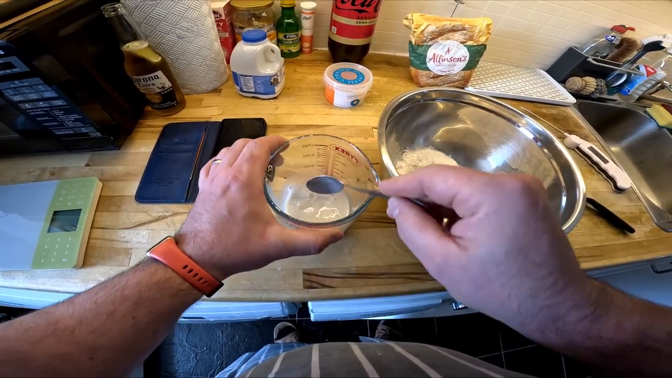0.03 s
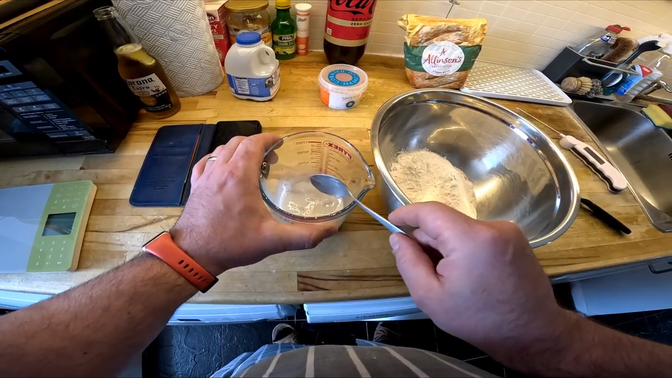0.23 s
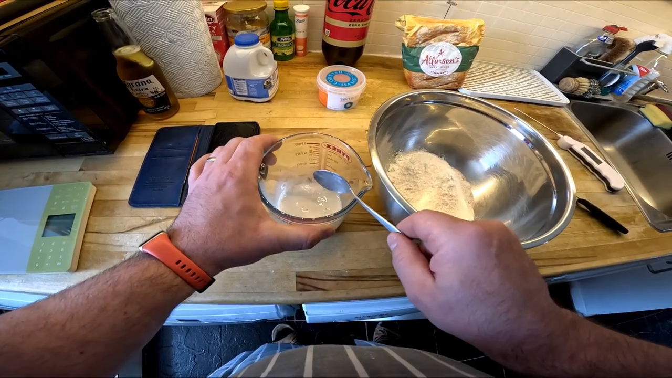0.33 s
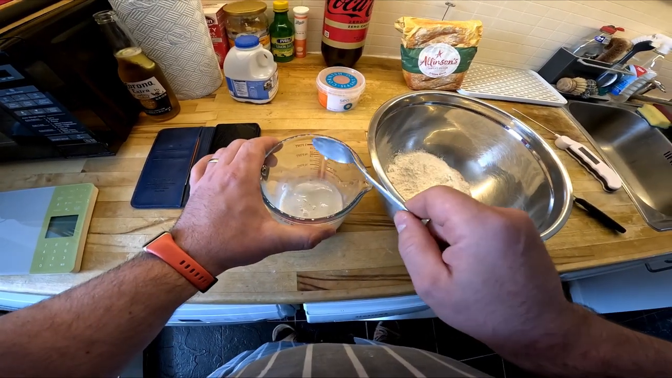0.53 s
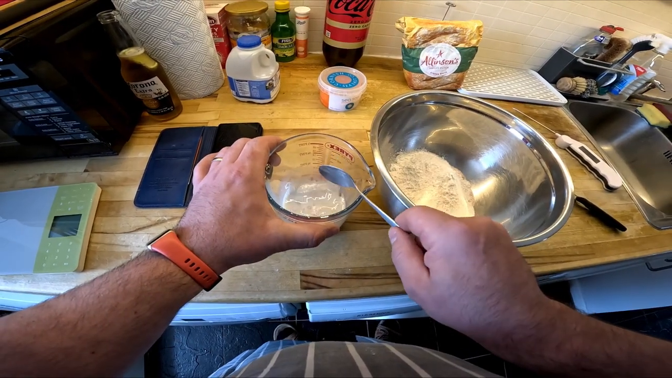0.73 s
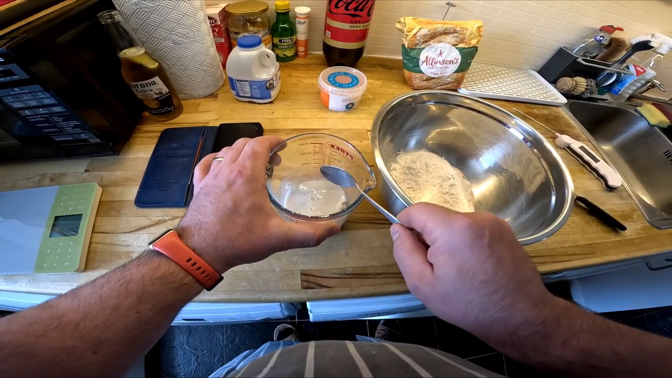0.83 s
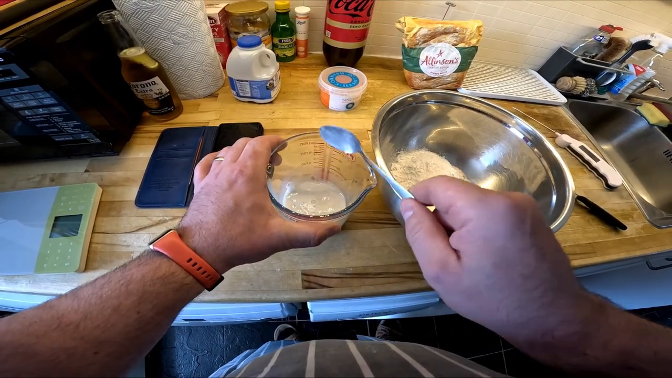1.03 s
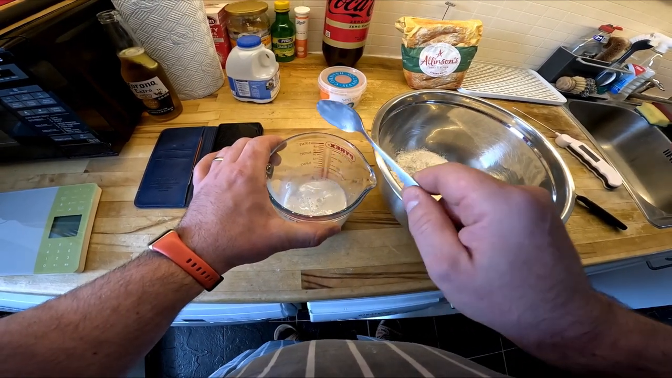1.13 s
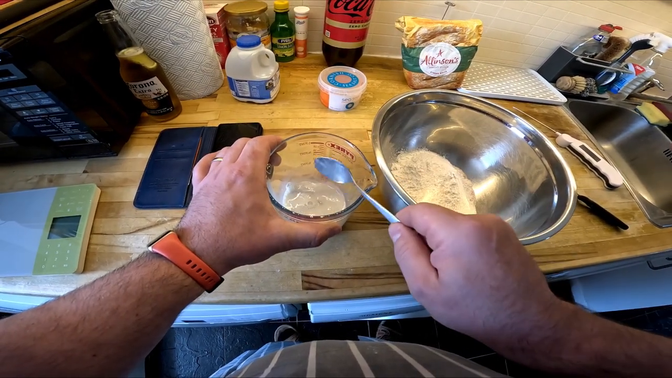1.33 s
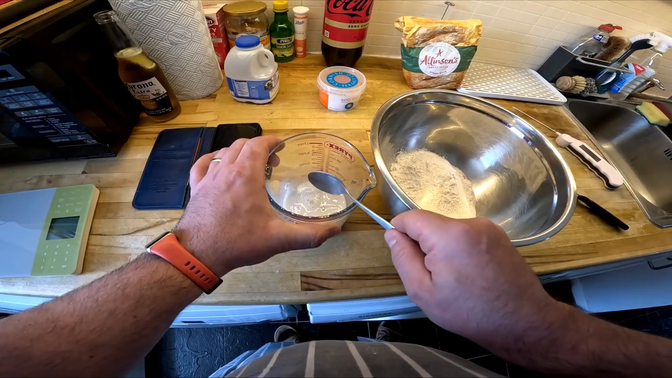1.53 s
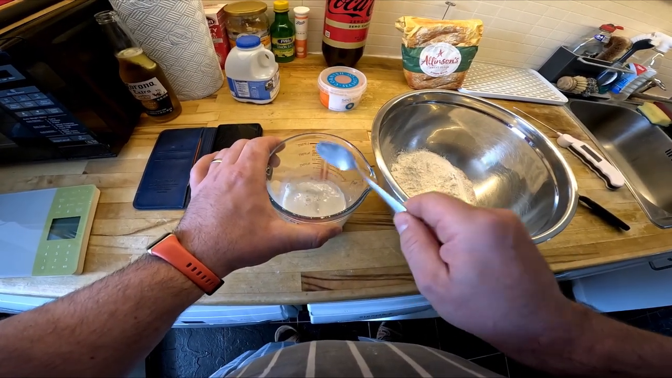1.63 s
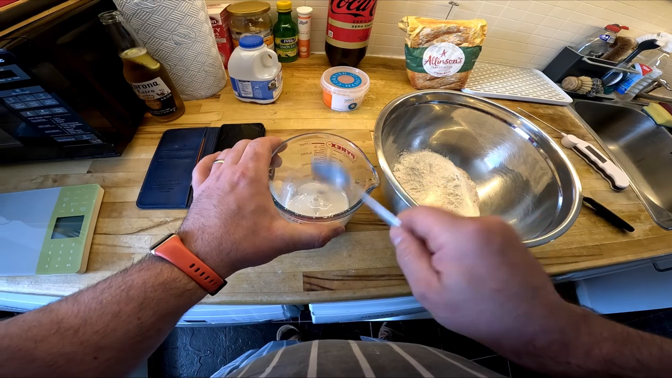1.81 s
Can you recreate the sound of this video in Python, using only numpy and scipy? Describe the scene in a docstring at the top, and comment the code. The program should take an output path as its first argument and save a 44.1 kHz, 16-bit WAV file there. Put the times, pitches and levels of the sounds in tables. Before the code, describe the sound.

A metal spoon clinks on a glass jug, hard, bright and quickly damped, heard close in stereo. A faint earlier tail fades, a soft low worktop knock comes at 0.19 seconds, then sharp raps at 0.22 and 0.79, with low thumps. Three quicker raps follow at 1.43, 1.51 and 1.62. Tiny ticks, faint steel bowl ringing, short kitchen echo, quiet hiss and wavering fridge hum surround them.

```python
"""In a kitchen, a hand raps a steel spoon on the rim of a small glass jug on a wooden worktop, close by.
Each rap sums decaying modes of jug, spoon and worktop with a clink and gritty contact noise.
Ticks of spoon and hand are filtered noise; soft low knocks, deep jolts and a ringing steel bowl join in.
Shaped noise makes the echoes, the hiss and an earlier rap's dying tail; a wavering sine makes the fridge hum."""
import sys
import numpy as np
from scipy import signal
from scipy.fft import rfft, irfft
from scipy.io import wavfile
from scipy.ndimage import uniform_filter1d

SR = 44100
rng = np.random.default_rng(int(sys.argv[2]) if len(sys.argv) > 2 else 0)


def volts_from_db(level):
    """Convert decibel levels to linear amplitude ratios."""
    exponent = np.asarray(level, float) / 20
    return 10 ** exponent


def waveform_to_disk(signal):
    """Save audio, clipped to [-1, 1], as 16-bit WAV at the path in sys.argv[1]."""
    frames = np.transpose(np.atleast_2d(signal))
    scaled = np.clip(frames, -1, 1) * 32767
    samples = np.round(scaled).astype(np.int16)
    wavfile.write(sys.argv[1], SR, samples)


N = 83790  # length [samples]

# room hiss, relative spectrum: (frequency [Hz], density [dB per Hz])
HISS_SPECTRUM = [(15, -22.5), (25, -0.5), (48, 4.5), (65, -17), (118, -18), (158, -6.5), (200, -17),
                 (500, -21), (680, -37), (1120, -28.5), (2200, -37.5), (4000, -46.5), (6500, -40.5),
                 (9000, -52.5), (15000, -63.5)]
# dying tail of an earlier rap, with a thin ring near 5 kHz, relative spectrum:
# (frequency [Hz], density [dB per Hz])
RAP_TAIL_SPECTRUM = [(60, -24.5), (100, -5.5), (194, -0.5), (353, -8.5), (500, -15.5), (1380, -18),
                     (3000, -29), (4900, -35.5), (5100, -24), (5300, -34.5), (7500, -37), (9000, -46),
                     (15000, -65)]
# strength of that dying tail: (time [s], rms level [dB])
RAP_TAIL_LEVEL = [(0, -57.5), (.1, -56.5), (.17, -54.5), (.45, -63.5), (.62, -72.5)]
# strength of the fridge hum: (time [s], rms level [dB])
HUM_LEVEL = [(0, -62.5), (.3, -59.5), (.4, -55), (.6, -59), (.66, -74), (.9, -68), (1.0, -57), (1.15, -70),
             (1.3, -66.5), (1.9, -65)]
# ticks of spoon and hand: (time [s], level [dB], centre [Hz], width of each filter [Hz], decay [s])
TICKS = [(.132, -56, 3500, 5000, .002), (.153, -65, 11500, 3000, .002), (.182, -53, 6000, 2000, .002),
         (.436, -58, 4800, 5000, .012), (.437, -58, 1190, 200, .02), (.497, -63, 11500, 3500, .002),
         (.671, -66, 6800, 1500, .003), (.748, -61, 8000, 7000, .002), (.972, -58, 5500, 1500, .004)]
# balance of the microphone ports: (frequency [Hz], left minus right [dB])
PORT_LEVEL = [(60, -1.5), (110, -2), (200, 1), (380, 2), (700, -1), (1290, -0.5), (2380, -2.5), (4400, 4),
              (8120, 2.5), (15000, -3)]
# phase between the ports: (frequency [Hz], lead of the left [rad])
PORT_PHASE = [(60, 0.32), (300, -.15), (1000, -.5), (2500, -1.2), (5000, 1), (7500, -0.83), (10000, -1.2),
              (14000, -1.5)]
# relative strength of the kitchen's echoes: (frequency [Hz], level [dB])
ROOM_COLOUR = [(60, -0.5), (300, 4.5), (1000, -1), (3000, -1.5), (7000, -7), (14000, -7)]
# reverberation time of the kitchen: (frequency [Hz], t60 [s])
ROOM_T60 = [(60, 0.77), (200, 0.32), (600, 0.46), (2000, .45), (5000, 0.41), (9000, 0.42), (14000, .3)]
# soft low knocks: the jug set down, then a faint thud just before a rap: (time [s], level [dB])
KNOCKS = [(0.19, -34.5), (0.199, -38), (0.771, -51)]
# worktop modes: (frequency [Hz], relative level [dB], t60 [s], gain per unit of strike place [dB])
WORKTOP_MODES = [(98.2, -4, 0.23, 0), (146.2, -3, 0.09, 1.5), (177.3, 7.5, 0.099, -8),
                 (238.6, -3.5, .15, -4), (290, -4.5, 0.11, -3.1), (335.4, -1.5, 0.14, 1.2),
                 (360.5, -7, 0.17, -0.1), (410, -8.5, .1, 0.9), (451, -6, 0.052, 4.9),
                 (522.2, -10.5, 0.15, .1), (733.2, -5, 0.082, -3.1), (900, -6, .05, 3)]
# raps: (time [s], jug [dB], spoon [dB], clink [Hz], clink [dB], worktop [dB], strike place [-1 to 1]), # the
# place running from near the bowl of the spoon (-1) up toward its handle (1)
RAPS = [(0.2241, -14, -23, 6007, 10.5, -27, -0.35), (0.7902, -17, -20.5, 6752, 14, -27, 0.77),
        (1.4273, -20.5, -23.5, 6800, 6, -34.5, 0.62), (1.5074, -18, -24, 6420, 8.5, -29.5, 0.666),
        (1.619, -17.5, -23, 6585, 4, -30.5, 0.53)]
# frequencies of the glass jug's modes: one column [Hz]
JUG_HZ = [790, 1184, 1690, 2295, 3010, 3340, 3385, 3625, 4165, 4555, 5170]
# those modes: (relative level [dB], t60 [s], gain per unit of strike place [dB])
JUG_MODES = [(-13, 0.045, 0.5), (-21, 0.067, -3.9), (-18, 0.099, -7.5), (-15.5, .05, -2.5),
             (-31, 0.19, -11.5), (-4.5, 0.078, 0.5), (-2.5, 0.074, -0.5), (-25.5, .02, 0.5),
             (-8.5, 0.041, 1.5), (0.5, 0.015, 0), (-18, 0.0084, -4)]
# frequencies of the steel spoon's modes: one column [Hz]
SPOON_HZ = [5820, 5850, 6180, 6400, 6680, 6780, 7080, 7345, 7800, 9610, 10050, 11130, 12850]
# those modes: (relative level [dB], t60 [s], gain per unit of strike place [dB])
SPOON_MODES = [(2, 0.043, -8.5), (-14.5, .35, -8), (-9.5, .01, -9), (-14.5, 0.011, -0.5), (0, .04, -6.9),
               (-2, 0.029, -10.5), (0, 0.015, 9.5), (4.5, .04, 2.5), (0.5, .02, 1), (-8.5, 0.018, 11),
               (-5.5, 0.0078, 10.5), (-14.5, 0.0093, -6.5), (-20.5, .012, -2.8)]
# gritty contact noise, relative spectrum: (frequency [Hz], level [dB])
GRIT_SPECTRUM = [(300, 0), (1500, 1), (2600, -7), (4800, 6.5), (7500, -0.5), (8700, -16.5), (9800, 6.5),
                 (11500, 0), (14000, -8), (15000, -19)]
# deep jolts through the stand: (time [s], level [dB])
THUMPS = [(0.226, -35), (.791, -28), (1.429, -41)]
# sympathetic swells of the steel bowl: (time [s], level [dB])
BOWL_RINGS = [(.905, -41), (1.734, -49.5)]


def curve(rows, at, log=False):
    """Linear interpolation: straight lines join the table rows, on a log axis if asked."""
    x, y = np.array(rows, float).T
    if log:
        return np.interp(np.log(at + 1), np.log(x + 1), y)
    return np.interp(at, x, y)


def add(out, s, x):
    """Superposition: x joins out from time s."""
    i = int(s * SR)
    out[i:i + len(x)] += x[:N - i]


def ring(hz, db, t60, rise):
    """Modal superposition: sines swell over the rise and lose 60 dB in each t60."""
    t = np.arange(SR // 2)[:, None] / SR
    swell = (1 - np.exp(-t / rise)) ** 2
    decay = np.exp(-np.log(1000) * t / t60)
    modes = volts_from_db(db) * np.sin(2 * np.pi * np.asarray(hz) * t) * swell * decay
    return modes.sum(axis=1)


def pulse(t, peak_s):
    """Impulse response of critical damping: a one-sided push that peaks at 1 at peak_s."""
    return t / peak_s * np.exp(1 - t / peak_s)


def pair(gain, like_hz, length):
    """Spatial coherence: two noises of one spectrum, alike in the bass and parting above like_hz."""
    hz = np.fft.rfftfreq(length, 1 / SR)
    mid, side = rfft(rng.standard_normal((2, length)))
    side = side * hz / (hz + like_hz)
    return irfft(gain(hz) * (mid + np.array([[1], [-1]]) * side), length)


def room_hiss():
    """Stationary noise: a fixed spectrum held at a steady rms level."""
    hiss = pair(lambda hz: volts_from_db(curve(HISS_SPECTRUM, hz, True)), 300, N)
    return volts_from_db(-59.5) * hiss / hiss.std()


def earlier_rap_tail():
    """Amplitude modulation: shaped noise follows the level of a dying tail that ends faint."""
    noise = pair(lambda hz: volts_from_db(curve(RAP_TAIL_SPECTRUM, hz, True)), 1500, N)
    level = volts_from_db(curve(RAP_TAIL_LEVEL, np.arange(N) / SR))
    return level * noise / noise.std()


def fridge_hum():
    """Frequency modulation: the phase of a sine accumulates its randomly drifting frequency."""
    centre_hz, waver_hz = 154, 2.5
    steps = np.repeat(rng.standard_normal(N // 2000 + 1), 2000)
    drift = uniform_filter1d(steps, 2000)[:N]
    phase = 2 * np.pi * np.cumsum(centre_hz + waver_hz * drift) / SR
    level = volts_from_db(curve(HUM_LEVEL, np.arange(N) / SR))
    return level * np.sqrt(2) * np.sin(phase)  # root two gives unit rms


def ticks():
    """Resonant filtering: noise passed twice through one resonance fades exponentially."""
    out, t = np.zeros(N), np.arange(int(.08 * SR)) / SR
    for s, db, hz, width_hz, decay_s in TICKS:
        b, a = signal.iirpeak(hz, hz / width_hz, SR)
        noise = rng.standard_normal(len(t))
        noise = signal.lfilter(b, a, signal.lfilter(b, a, noise))
        envelope = np.exp(-t / decay_s) * (1 - np.exp(-t / .0005))
        add(out, s, volts_from_db(db) * noise / noise.std() * envelope)
    return out


def microphone_ports(near):
    """Interchannel difference: near sound meets the two ports with unequal level and phase."""
    hz = np.fft.rfftfreq(N, 1 / SR)
    side = np.array([[.5], [-.5]])  # each port takes half the difference
    level = volts_from_db(side * curve(PORT_LEVEL, hz, True))
    phase = np.exp(1j * side * curve(PORT_PHASE, hz, True))
    return irfft(rfft(near) * level * phase, N)


def kitchen(near):
    """Diffuse reverberation: convolution with noise whose half-octave bands each decay at their own rate."""
    first_echo_s, like_hz = .0015, 1200
    t = np.arange(SR) / SR
    tail = 0
    for centre in 45 * 2 ** (np.arange(18) / 2):
        def bell(hz):
            octaves = np.log2((hz + 1) / centre)
            return np.cos(np.pi * np.clip(octaves, -.5, .5)) ** 2
        decay = np.exp(-np.log(1000) * t / curve(ROOM_T60, centre, True))
        tail = tail + pair(bell, like_hz, SR) * volts_from_db(curve(ROOM_COLOUR, centre, True)) * decay
    onset = np.clip(t / first_echo_s - .5, 0, 1)
    tail = tail * onset * 3 / np.sqrt(SR)
    return signal.fftconvolve(near[None], tail, axes=1)[:, :N]


def wall_echo(near):
    """Specular reflection: a near wall returns one clear, weaker copy after a delay."""
    out = np.zeros(N)
    add(out, .0178, volts_from_db(-22) * near)
    return out


def knocks():
    """Modal excitation: soft low knocks set the worktop modes swelling and decaying."""
    out = np.zeros(N)
    hz, db, t60, _ = np.array(WORKTOP_MODES).T
    for s, knock_db in KNOCKS:
        add(out, s, ring(hz, db + knock_db, t60, .003))
    return out


def struck_modes(hz, modes, blow_db, place, scatter_db, rise_s):
    """Modal participation: strike place tilts the mode strengths, with chance scatter at each rap."""
    db, t60, tilt_db = modes
    scatter = scatter_db * rng.standard_normal(len(db))
    return ring(hz, db + blow_db + place * tilt_db + scatter, t60, rise_s)


def contact_grit():
    """Contact noise: a short pulse of force shapes gritty broadband noise."""
    t = np.arange(SR // 20) / SR
    # the very high parting frequency leaves the pair nearly alike; one of them serves
    noise = pair(lambda hz: volts_from_db(curve(GRIT_SPECTRUM, hz, True)), 1e6, len(t))[0]
    return noise * pulse(t, .0018)


def raps():
    """Impact excitation: one blow wakes jug, spoon, clink and grit, then the worktop."""
    rise_s = .00037  # rings swell while steel and glass touch
    push_s, thud_late_s = .00073, .003  # the jug pushes the worktop softly and later
    out = np.zeros(N)
    jug, spoon, worktop = np.array(JUG_MODES).T, np.array(SPOON_MODES).T, np.array(WORKTOP_MODES).T
    for s, jug_db, spoon_db, clink_hz, clink_db, worktop_db, place in RAPS:
        add(out, s, struck_modes(JUG_HZ, jug, jug_db, place, 1, rise_s))
        add(out, s, struck_modes(SPOON_HZ, spoon, spoon_db, place, 1, rise_s))
        # the clink is the damped bending of the held spoon
        add(out, s, ring(clink_hz, clink_db, t60=.0075, rise=.0011))
        add(out, s, volts_from_db(clink_db - 33.5) * contact_grit())
        thud = struck_modes(worktop[0], worktop[1:], worktop_db, place, 2, push_s)
        add(out, s + thud_late_s, thud)
    return out


def thumps():
    """Impulsive loading: each deep jolt through the stand is a single one-sided push."""
    out, t = np.zeros(N), np.arange(SR // 20) / SR
    for s, db in THUMPS:
        add(out, s, volts_from_db(db) * pulse(t, .006))
    return out


def steel_bowl():
    """Sympathetic resonance: one mode of the bowl swells slowly, then decays."""
    out = np.zeros(N)
    for s, db in BOWL_RINGS:
        add(out, s, ring(585, db, t60=.27, rise=.01))
    return out


def scene():
    """Superposition of direct sound, reflections and background at the two ports."""
    near = ticks() + knocks() + raps() + thumps() + steel_bowl()
    near = near + wall_echo(near)
    background = room_hiss() + earlier_rap_tail() + fridge_hum()
    return microphone_ports(near) + kitchen(near) + background


def band_limit(x):
    """A steep low-pass at the top of the band."""
    return signal.sosfilt(signal.butter(12, 15800, fs=SR, output="sos"), x)


def record(dry):
    """Linear filtering and clipping: faint fore-echoes, a dull top end, a limit at full scale."""
    fore_s, fore_db, fore_step_db = .0107, -25.5, -12.5
    mix = dry.copy()
    for k in (1, 2, 3):  # each earlier copy is weaker
        lead = int(k * fore_s * SR)
        mix[:, :-lead] += volts_from_db(fore_db + (k - 1) * fore_step_db) * dry[:, lead:]
    lowpass = signal.butter(N=10, Wn=14200, fs=SR, output="sos")
    mix = signal.sosfilt(lowpass, mix)
    mix = np.clip(mix, -1, 1)
    return band_limit(mix)


dry = scene()
out = record(dry)
waveform_to_disk(out)
```